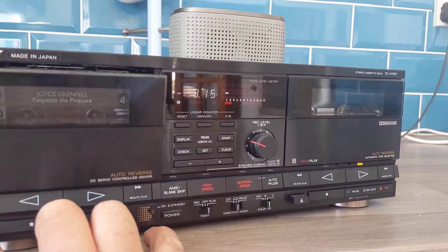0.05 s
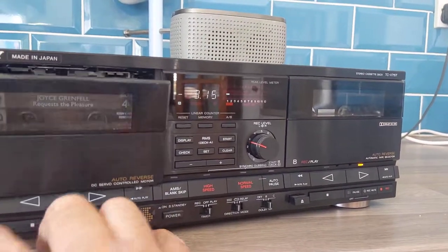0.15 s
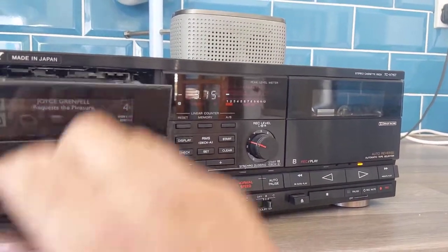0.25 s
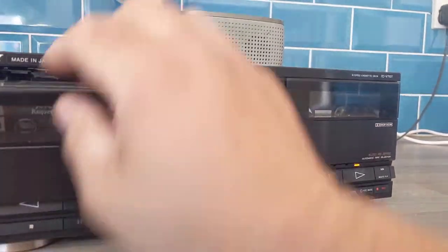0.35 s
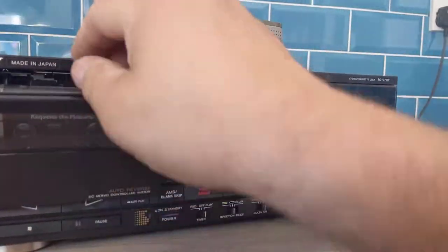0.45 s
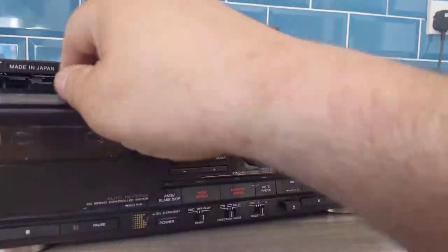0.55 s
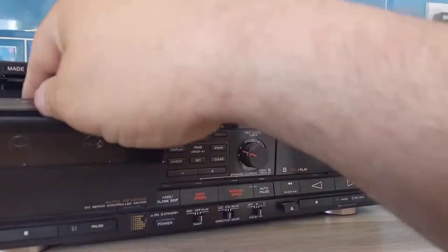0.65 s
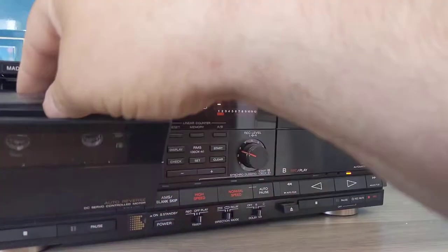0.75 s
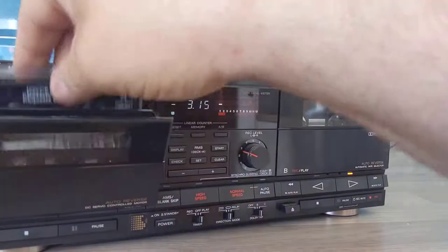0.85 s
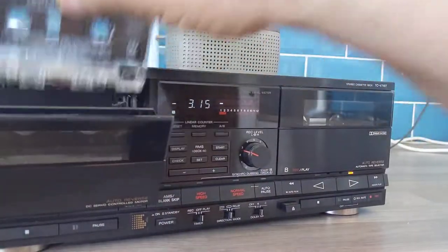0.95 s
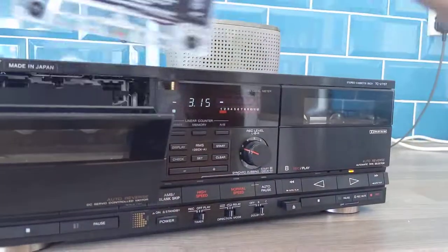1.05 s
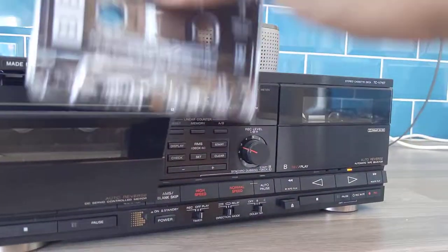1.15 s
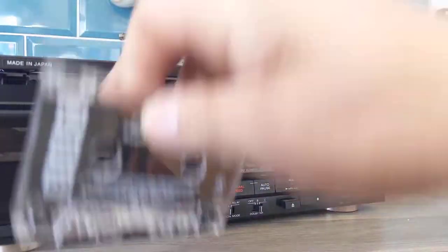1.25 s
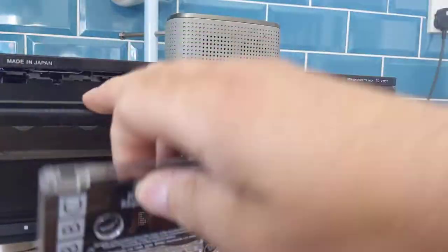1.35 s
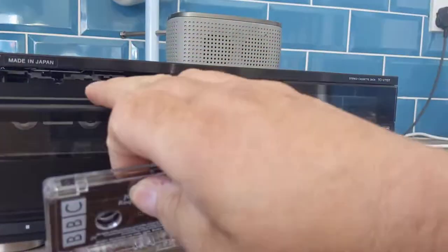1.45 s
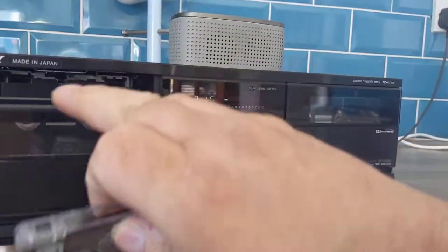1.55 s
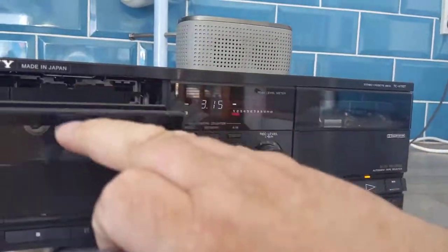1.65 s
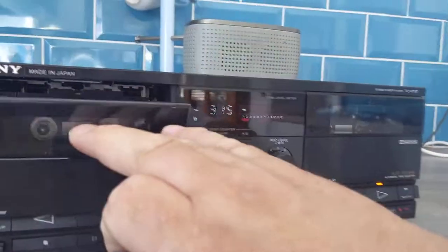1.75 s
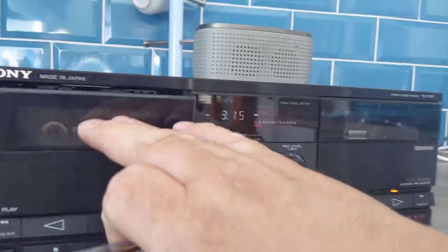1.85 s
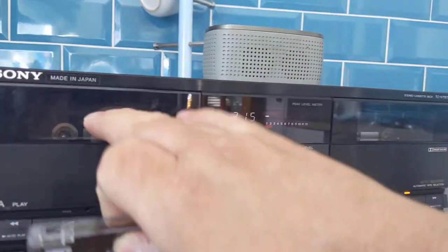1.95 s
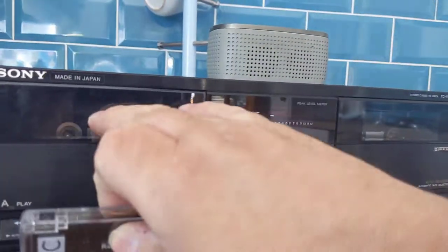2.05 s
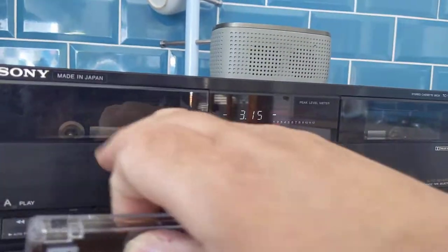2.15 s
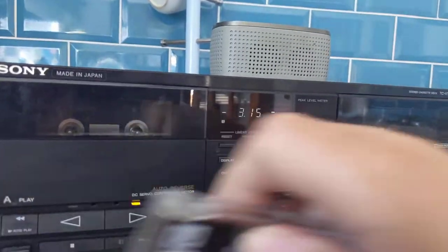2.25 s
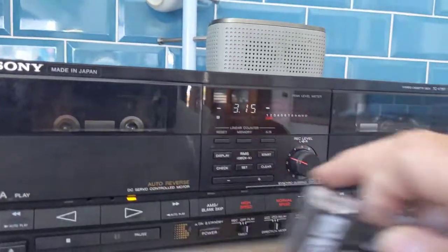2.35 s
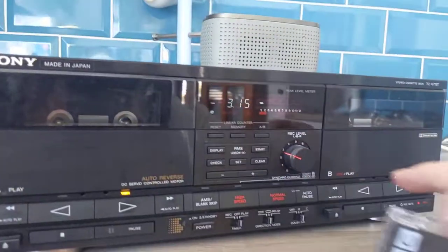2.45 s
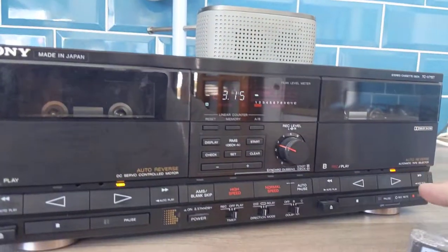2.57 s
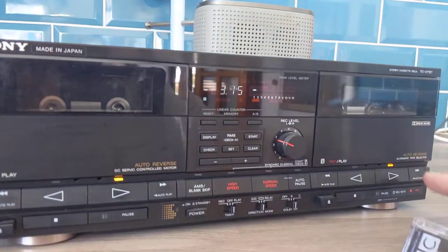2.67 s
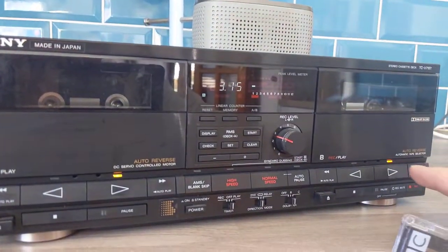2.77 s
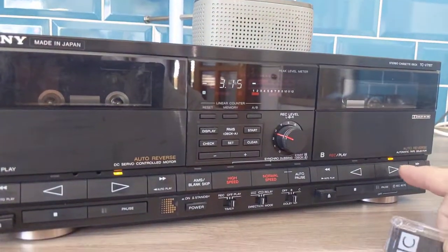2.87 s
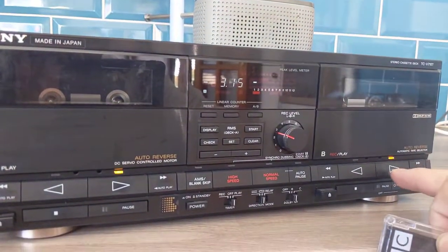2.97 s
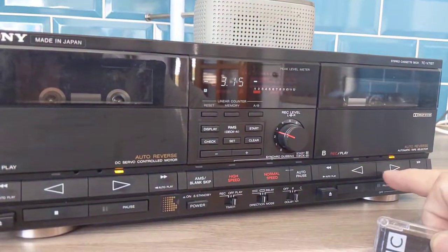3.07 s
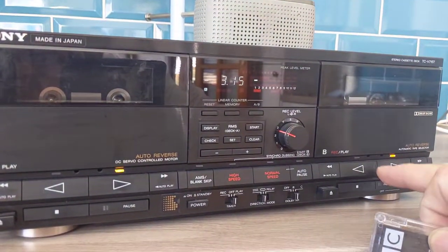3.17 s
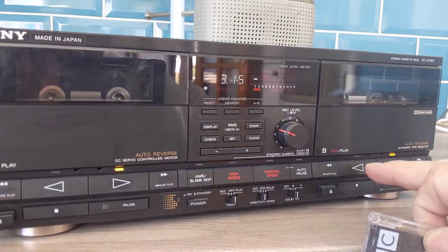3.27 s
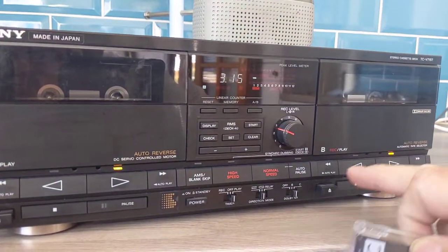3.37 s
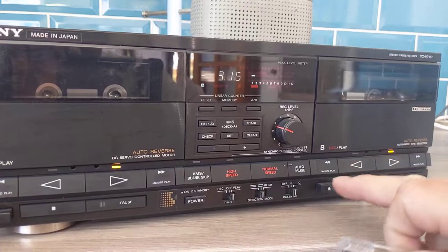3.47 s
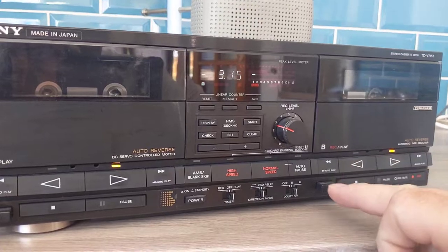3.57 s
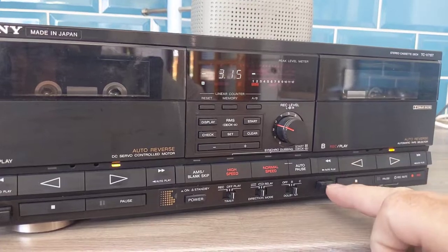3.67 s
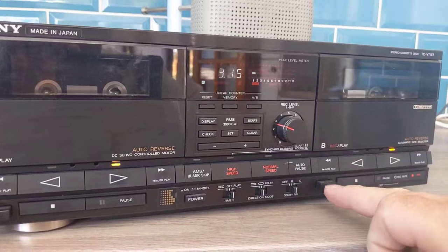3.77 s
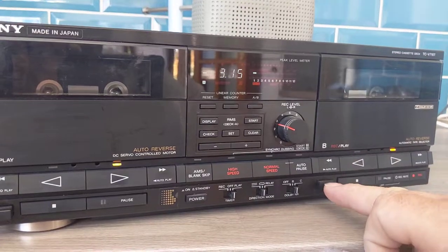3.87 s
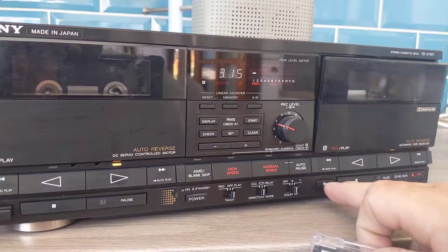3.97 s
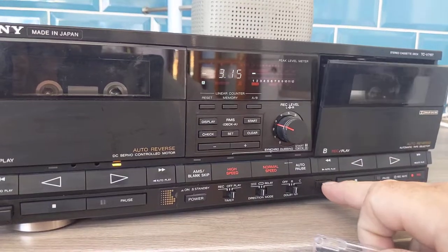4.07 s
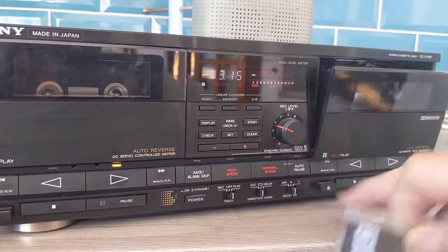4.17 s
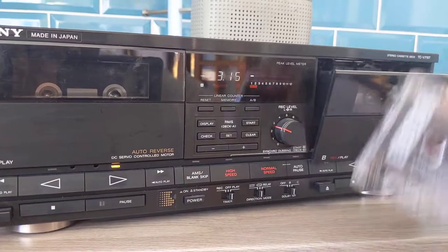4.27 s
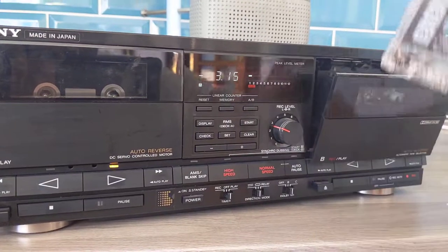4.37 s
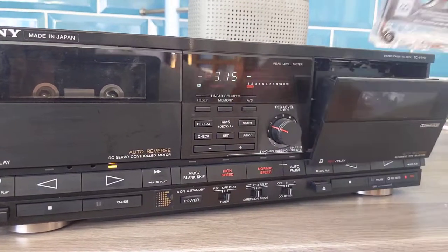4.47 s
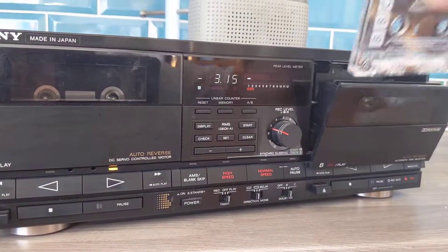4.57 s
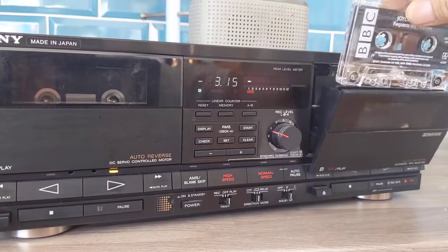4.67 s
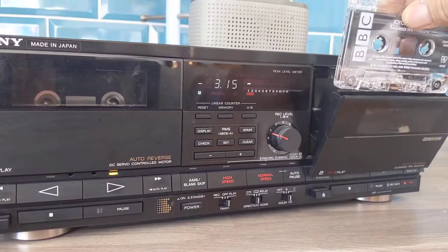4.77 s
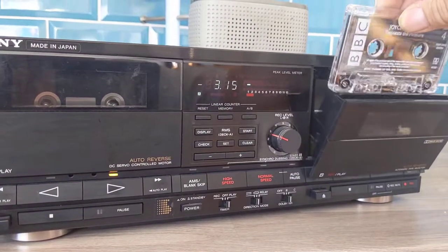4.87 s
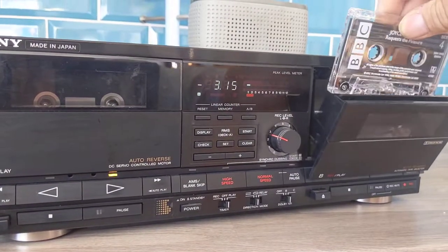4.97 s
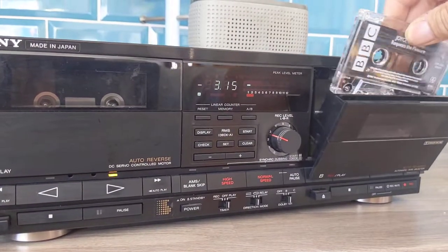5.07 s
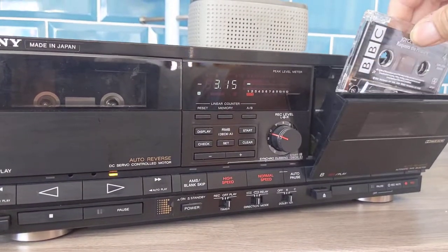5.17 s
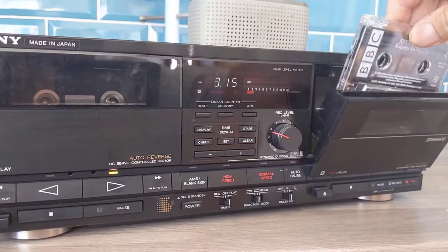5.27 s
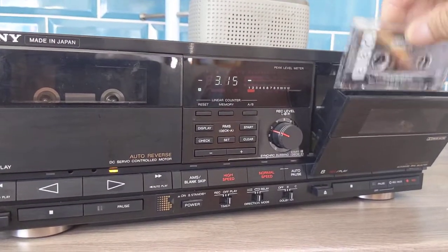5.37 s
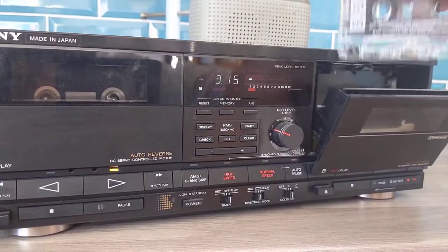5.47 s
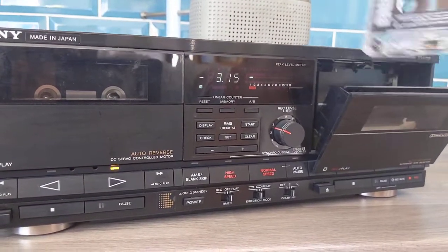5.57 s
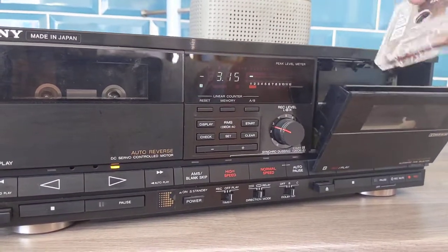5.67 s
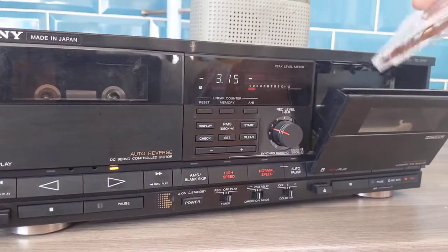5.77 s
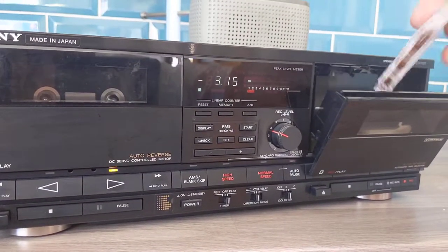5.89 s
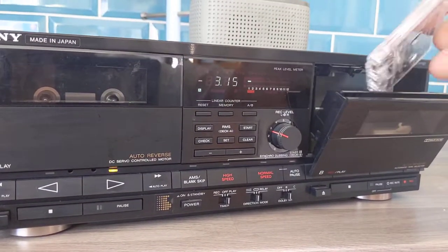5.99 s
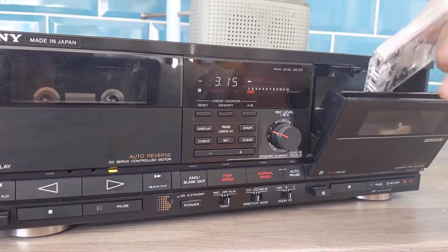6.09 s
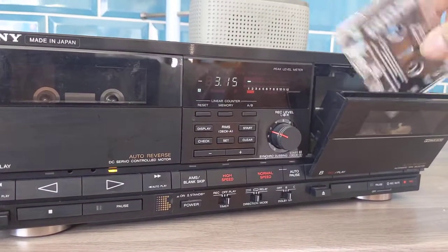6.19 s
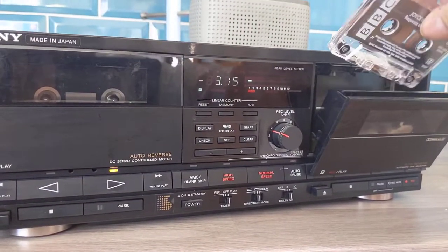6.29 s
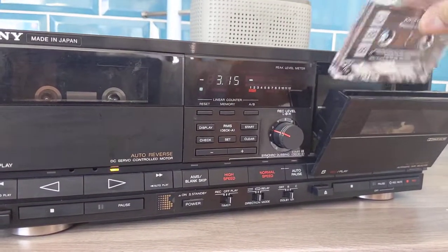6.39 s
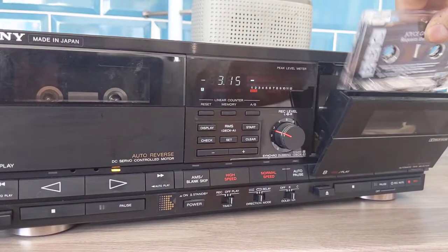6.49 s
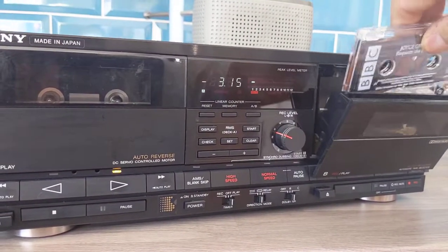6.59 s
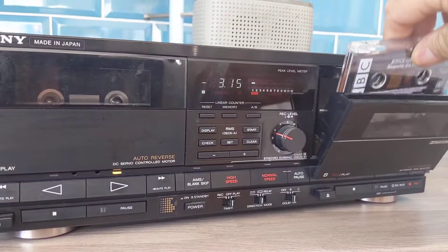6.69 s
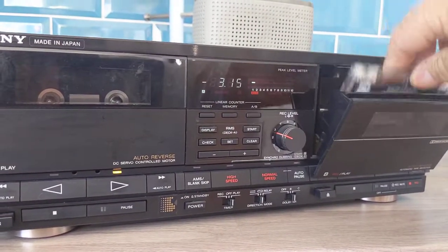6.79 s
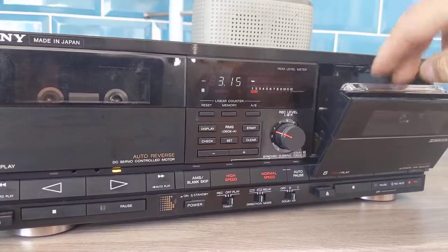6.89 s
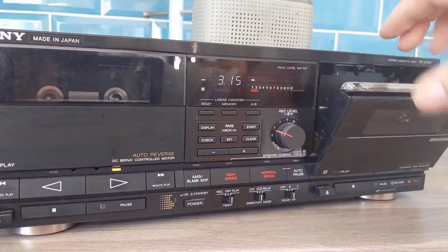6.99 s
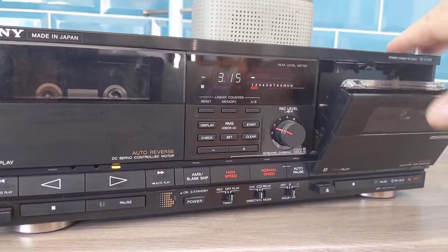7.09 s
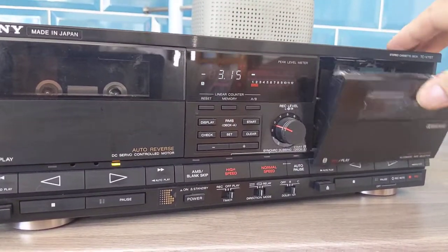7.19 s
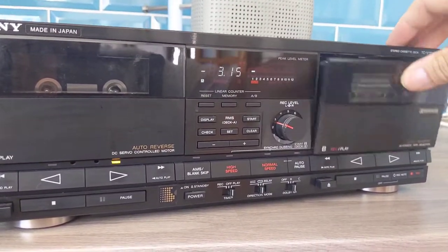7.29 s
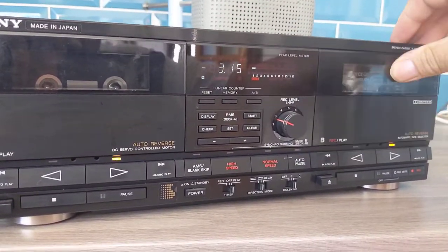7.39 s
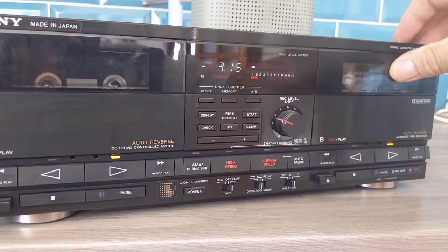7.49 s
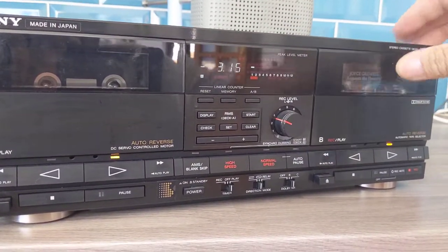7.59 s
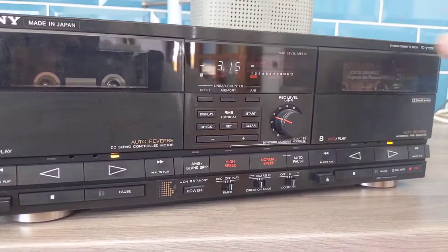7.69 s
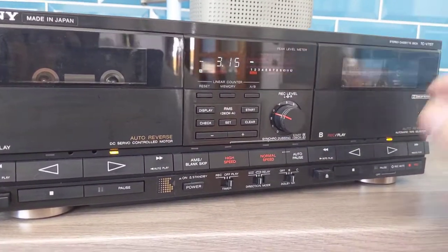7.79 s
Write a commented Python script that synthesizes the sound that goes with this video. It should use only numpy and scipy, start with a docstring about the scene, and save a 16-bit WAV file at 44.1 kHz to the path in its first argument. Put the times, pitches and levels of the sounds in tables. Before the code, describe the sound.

Close, dry clunks of cassette deck doors opening and snapping shut, a plastic tape rattling and tapping between, over a faint room hiss.

```python
"""Hand at a twin cassette deck

A deck on a counter in a small tiled room, heard close up by a two-port microphone. A door pops open, a plastic
cassette is pulled out, rattles, taps the other well, slides in and the doors click shut. Every contact is a short
scrape of hard plastic that rings the cabinet and is answered by the tiles. Shaped noise makes the sliding,
the gear whirr and the faint room floor; wavering sines make two thin squeaks."""
import sys
import numpy as np
from scipy import signal
from scipy.fft import rfft, irfft, next_fast_len
from scipy.io import wavfile
from scipy.ndimage import uniform_filter1d, map_coordinates

SR = 44100
rng = np.random.default_rng(int(sys.argv[2]) if len(sys.argv) > 2 else 0)


def int16_out(signal):
    """Quantize to a 16-bit WAV file."""
    q = np.round(np.clip(np.atleast_2d(signal).T, -1, 1) * 32767)
    wavfile.write(sys.argv[1], SR, q.astype(np.int16))


N = 345744
SPAN, LEAD = 16384, 256  # window of one contact and the silence at its start [samples]


def amp(db):
    """Decibels to linear gain."""
    return 10 ** (np.asarray(db) / 20)


def unit(x):
    """Scales a signal to rms 1."""
    return x / np.sqrt(np.mean(x ** 2) + 1e-20)


def along(points, hz):
    """Reads a curve of (frequency [Hz], value) on a log frequency axis."""
    f, v = np.transpose(points)
    return np.interp(np.log(hz + 1), np.log(f + 1), v)


def level(points):
    """Gain per sample from a curve of (time [s], level [dB]); -120 dB outside it."""
    when, db = np.transpose(points)
    return amp(np.interp(np.arange(N) / SR, when, db, left=-120, right=-120))


def wobble(rate):
    """A smooth random curve with `rate` knots a second."""
    knots = rng.standard_normal(int(N * rate / SR) + 4)
    return map_coordinates(knots, [np.arange(N) * rate / SR])


def filtered(x, response):
    """Multiplies the spectrum of x by a response of frequency."""
    m = next_fast_len(N + 8192)
    return irfft(rfft(x, m) * response(np.fft.rfftfreq(m, 1 / SR)), m)[..., :N]


# Likeness of diffuse sound at the two ports: (frequency [Hz], correlation [-1 to 1])
PORT_LIKENESS = [(30, 1), (70, 0.79), (110, 0.98), (180, 0.92), (550, 0.6), (900, 0.31), (1650, -0.027),
                 (4970, -0.12), (15000, -0.083)]


def diffuse(pair, f):
    """Mixes two unrelated spectra so that the ports agree closely in the bass only."""
    turn = np.arccos(np.clip(along(PORT_LIKENESS, f), -1, 1)) / 2
    mid = pair[..., 0, :] * np.cos(turn)
    side = pair[..., 1, :] * np.sin(turn)
    return np.stack([mid + side, mid - side], axis=-2)


def rush(spectrum):
    """Diffuse stereo noise of rms 1, coloured by (frequency [Hz], relative level [dB per Hz])."""
    m = next_fast_len(N)
    f = np.fft.rfftfreq(m, 1 / SR)
    noise = rfft(rng.standard_normal((2, m)))
    return unit(irfft(diffuse(noise, f) * amp(along(spectrum, f)), m)[:, :N])


# Colour of the room floor: (frequency [Hz], relative level [dB per Hz])
FLOOR_COLOUR = [(29, -58), (50, -10), (81, -15.5), (103, -23), (234, -26), (450, -25.5), (483, -27.5),
                (572, -31.5), (997, -28.5), (3030, -38), (4040, -38.5), (4900, -39.5), (7800, -48),
                (10300, -41), (16000, -51.5)]
# Course of the lowest rumble: (time [s], level [dB])
RUMBLE_LEVEL = [(0.0, -54), (0.57, -56.5), (1.03, -68), (1.77, -51.5), (2.12, -70), (2.51, -50.5),
                (4.37, -58), (4.39, -65.5), (7.84, -57.5)]


def room_floor():
    """Faint drifting hiss over a low rumble that comes and goes, its lumps a little different at each port."""
    hiss = amp(-60 + 1.2 * wobble(1.96)) * rush(FLOOR_COLOUR)
    rumble_colour = [(8, -24), (19, -4.5), (30, -13.5), (45, -52.0), (80, -56.0), (200, -120)]
    lumps = amp(0.65 * wobble(7.5) + 1.9 * np.array([wobble(9), wobble(7.2)]))
    rumble = level(RUMBLE_LEVEL) * unit(lumps * rush(rumble_colour))
    return hiss + rumble


# Brief turning of the mechanism: (time [s], level [dB])
WHIRR_LEVEL = [(2.613, -62), (2.824, -61), (2.954, -73), (3.0, -71)]
# Colour of the gears: (frequency [Hz], relative level [dB per Hz])
GEAR_COLOUR = [(410, -44), (700, -12), (1220, -27), (1490, 7), (2090, 8), (3810, -15), (5000, -12),
               (6500, -52), (11000, -120)]
# Faint thin squeaks: (start [s], end [s], mean pitch [Hz], mean peak level [dB])
SQUEAK_EVENTS = [(4.596, 4.633, 2280, -54), (4.605, 4.668, 4120, -61)]


def mechanism():
    """Small gears whirr as flickering coloured noise; squeaks are sines wavering in pitch and level."""
    t = np.arange(N) / SR
    out = level(WHIRR_LEVEL) * unit(amp(1.1 * wobble(110)) * rush(GEAR_COLOUR))
    for start, stop, hz, db in SQUEAK_EVENTS:
        swell = np.sin(np.pi * np.clip((t - start) / (stop - start), 0, 1))
        loudness = amp(db + 2.5 * wobble(120)) * swell
        phase = 2 * np.pi * np.cumsum(hz + 40 * wobble(300)) / SR
        out = out + loudness * np.sin(phase)
    return out


# Fingers and plastic sliding: (start of hold [s], held [s], body level [dB], hiss level [dB])
STROKE_EVENTS = [(0, 0.011, -38.5, -45.5), (0.219, 0.0027, -43.5, -50.5), (0.699, .25, -51.5, -59.5),
                 (1.38, 0.14, -59, -58.5), (1.49, 0.0073, -50.5, -62), (1.77, 0.071, -77, -81),
                 (1.89, .04, -52.5, -72), (2.023, 0.006, -33.5, -40), (2.2, 0.057, -56.5, -81),
                 (3.9, .2, -56.5, -88), (4.16, 0.21, -55.5, -67), (4.4, 0.24, -61.5, -66),
                 (4.712, 0.026, -46.5, -68), (4.83, 0.16, -51, -60), (5.399, .05, -56, -56),
                 (5.52, 0.03, -38.5, -45), (5.63, 0.011, -39, -50), (5.82, 0.18, -61.5, -71),
                 (6.15, 0.043, -56, -64.5), (6.32, 0.0049, -40.5, -52), (6.58, 0.013, -38.5, -50),
                 (6.68, 0.033, -48.5, -68), (6.822, 0.09, -42, -47), (7, 0.28, -61, -97),
                 (7.36, .05, -42.5, -53), (7.441, 0.02, -33, -42), (7.64, 0.051, -55.5, -75.5)]
# Body of the sliding: (frequency [Hz], relative level [dB per Hz])
SLIDE_COLOUR = [(120, -63), (200, -3.5), (281, -9), (466, -15.5), (1160, -7.5), (1410, -13.5), (1980, -8),
                (4500, -22), (5850, -89), (9900, -120)]
# Hiss of the sliding: (frequency [Hz], relative level [dB per Hz])
HISS_COLOUR = [(2350, -21), (4000, 1), (5310, 10), (6110, 2.5), (12400, 0.5), (16000, -1)]
STROKE_RISE_DB_PER_S, STROKE_FALL_DB_PER_S = 182, 141


def rubbing():
    """Skin and plastic slide over plastic: each stroke swells, holds and dies, a grainy rustle."""
    grain = amp(1.8 * wobble(40) + 2.5 * wobble(250))
    t = np.arange(N) / SR
    body, hiss = np.full(N, -120.0), np.full(N, -120.0)  # levels in dB
    for start, held, body_db, hiss_db in STROKE_EVENTS:
        before_db = STROKE_RISE_DB_PER_S * np.maximum(start - t, 0)
        after_db = STROKE_FALL_DB_PER_S * np.maximum(t - start - held, 0)
        away_db = before_db + after_db
        body = np.maximum(body, body_db - away_db)  # the louder stroke wins
        hiss = np.maximum(hiss, hiss_db - away_db)
    return amp(body) * unit(grain * rush(SLIDE_COLOUR)) + amp(hiss) * unit(grain * rush(HISS_COLOUR))


# Decay of the tiled room: (frequency [Hz], time to fall 60 dB [s])
TILE_DECAY = [(150, 0.94), (500, 0.37), (1500, 0.36), (4000, 0.38), (12000, 0.26)]


def tiles(count, f):
    """A new diffuse noise tail for each contact; every frequency dies at its own speed."""
    noise = rng.standard_normal((count, 2, SPAN * 3 // 4))
    hz, t, z = signal.stft(noise, SR, nperseg=256, noverlap=128)
    decay = amp(-60 * t / along(TILE_DECAY, hz)[:, None])
    tail = signal.istft(z * decay, SR, nperseg=256, noverlap=128)[1]
    tail = tail * np.clip((np.arange(tail.shape[-1]) - LEAD) / (0.0033 * SR), 0, 1)  # builds up over 3.3 ms
    return diffuse(rfft(tail / np.sqrt(np.mean(np.sum(tail ** 2, axis=-1))), SPAN), f)


def nearby(count, echo_db, within_s):
    """A few quick echoes off counter and cabinet, different at each port."""
    when, size = rng.random((count, 2, 6)), rng.standard_normal((count, 2, 6))
    delay = np.clip(when * within_s * SR, 8, 2000).astype(int)
    paths = np.zeros((count, 2, SPAN // 8))
    np.put_along_axis(paths, delay, amp(echo_db) * size, axis=2)
    return rfft(paths, SPAN)


def peak(f, hz, width_hz):
    """A causal resonance of gain 1 at its centre."""
    return 1j * f * width_hz / (hz * hz - f * f + 1j * f * width_hz)


def ringing(f, modes, scatter_db, near_hz, db_per_octave):
    """One response per blow: modes draw new strengths and signs, and change level by a set amount per octave
    away from the struck pitch."""
    hz, db, t60 = np.transpose(modes)
    draw = rng.standard_normal((len(near_hz), 2, len(hz)))
    shapes = peak(f, hz[:, None], np.log(1000) / np.pi / np.abs(t60[:, None]))
    db = db - db_per_octave * np.abs(np.log2(hz / near_hz))
    strength = amp(db + scatter_db * draw[:, 0]) * np.sign(draw[:, 1])
    return strength @ shapes


def scrape(rise_s, life_s, after_db, after_s, grit_db):
    """Rough pushes, one a row: a gritty blow that stops short, then the many small panel modes rustling out."""
    t = np.arange(SPAN // 3) / SR
    blow_and_rustle = np.exp(-(t / life_s) ** 2) + amp(after_db) * np.exp(-t / after_s)
    shape = (1 - np.exp(-t / rise_s)) * blow_and_rustle
    noise, grit = rng.standard_normal((2, *shape.shape))
    grit = amp(grit_db * unit(uniform_filter1d(grit, size=24)))  # the surfaces chatter as they meet
    push = rfft(np.pad(noise * grit * shape, ((0, 0), (LEAD, 0))), SPAN)
    return push / np.sqrt(uniform_filter1d(np.abs(push) ** 2, size=128))  # drives every band about equally


RISE_S = 0.00097  # build-up time constant of a blow
KNOCK_DB, KNOCK_DB_PER_DOUBLE_LENGTH = 0, -2.5  # clean knock over the scrape; a long contact is mostly scrape
USUAL_MS = 6.5  # contact length at which the knock and room trims are zero
THUD_LATE_S = 0.00392  # the heavy chassis answers a moment later


def push_spectra(f, ms):
    """The force of hand on plastic, per layer: rough blow, shorter rough snap twice, plain push, late push."""
    life, rise = np.clip(ms, .5, 60) / 1000, np.full_like(ms, RISE_S)
    blow = scrape(rise, life, -13.5, 0.044, 5.3)
    snap = scrape(0.46 * rise, 0.47 * life, -19.0, 0.031, 6.8)  # the treble of a blow is over sooner
    shove = np.exp(-2j * np.pi * f * (LEAD / SR + rise))  # one plain push
    knock_db = KNOCK_DB + KNOCK_DB_PER_DOUBLE_LENGTH * np.log2(ms / USUAL_MS)
    blow = blow / np.sqrt(np.mean(np.abs(blow) ** 2, axis=-1, keepdims=True)) + amp(knock_db) * shove
    late_shove = shove * np.exp(-2j * np.pi * f * THUD_LATE_S)
    return np.array([blow, snap, snap, shove, late_shove])


# Panels and doors of the cabinet: (frequency [Hz], relative level [dB], time to fall 60 dB [s])
CABINET_MODES = [(697, 2.5, 0.16), (726, -3, 0.028), (774, -1.5, 0.017), (869, -6.5, 0.031),
                 (898, -2.5, 0.022), (1180, -1.5, 0.067), (1249, -5.5, 0.027), (1400, -10, 0.017),
                 (1701, -3, 0.073), (1860, -8.5, 0.096), (2060, -4.5, 0.1), (2426, -7, 0.13),
                 (2630, -7, 0.095), (2890, -7.5, 0.2), (3900, -18, 0.1), (4830, -29, 0.029)]
# Hollow chassis on the counter: (frequency [Hz], relative level [dB], time to fall 60 dB [s])
CHASSIS_MODES = [(73.4, -17, 0.25), (113, -17.5, 0.32), (137, -10.5, 0.55), (165.1, -13, 0.33),
                 (210.9, -9.5, 0.16), (258.8, -5, 0.43), (269.6, -2.5, 0.51), (299.9, -3.5, 0.29),
                 (363.1, -2.5, 0.32), (390.4, -11.5, 0.21)]
RING_WIDTH_HZ, RING_SWELL_HZ = 55.6, 258  # the struck part's own note: how soon it dies, how fast it swells
NEIGHBOUR_DB, NEIGHBOUR_SPREAD = -10, 0.157  # joined parts ring along; typical distance [natural log of pitch]


def body_responses(f, hz):
    """What each push sets ringing: panel clack, hard edge, treble tick, the struck part's note, chassis thud."""
    def note(at):
        return peak(f, at, RING_WIDTH_HZ) * peak(f, at, RING_SWELL_HZ)

    struck = peak(f, hz, 0.35 * hz) ** 2
    panels = ringing(f, CABINET_MODES, 2.54, hz, db_per_octave=4)
    clack = struck + amp(-0.5) * peak(f, 1860, 1370) ** 2 + amp(10.5) * panels
    clack = clack * (f / (f - 600j)) ** 3 * 4000 / (4000 + 1j * f)  # small panels radiate no bass
    edge = peak(f, 3455, 3950) ** 2
    tick = peak(f, 9730, 4570) * peak(f, 10000, 6000) + amp(4.5) * peak(f, 6300, 6950) ** 2
    beside = hz * np.exp(NEIGHBOUR_SPREAD * np.array([-1, 1]) * (.5 + rng.random((len(hz), 2))))
    ring = note(hz) + amp(NEIGHBOUR_DB) * (note(beside[:, 1:]) - note(beside[:, :1]))
    # chassis modes gain a little with distance from the struck pitch
    thud = ringing(f, CHASSIS_MODES, 3.9, hz, db_per_octave=-1) * 400 / (400 + 1j * f)
    return np.array(np.broadcast_arrays(clack, edge, tick, ring, thud))


# Every contact: (time [s], clack peak before placing [dB], thud [dB], edge [dB], treble [dB],
# struck pitch [Hz], contact length [ms], ring [dB]); the ring is its peak over the clack's peak,
# thud, edge and treble are short-burst rms over the clack's peak
CONTACT_EVENTS = [(0.003, -27.5, -16, -17, -11, 1210, 3.6, -9), (0.038, -16, -29, -6.5, -5, 772, 7.3, -12),
                  (0.043, -20, -38, -9, -11, 1690, 5.5, -3.5),
                  (0.186, -17.5, -20.5, -6, -9.5, 1164, 5.6, -5.5),
                  (0.191, -25, -32, -8, -15, 2476, 5.1, -5), (0.526, -41, -23, -20, -18, 1010, 9.1, -7),
                  (0.537, -30.5, -19.5, -35, -11.5, 776, 11, 2),
                  (0.552, -34, -16.5, -30, -25, 890, 5.7, -3), (0.671, -38.5, -33, -28, -4, 1650, 4.2, -14),
                  (0.68, -34, -12, -27, -10, 1920, 12, -9), (0.71, -51, 1.5, -25, -20, 890, 5.5, -3),
                  (0.731, -53, -14, -23, 5, 1160, 6.4, -9), (0.779, -43.5, -23, -20, -10, 1680, 18, -3),
                  (0.793, -26, -16, -4.5, -2, 1680, 5.4, -11), (0.805, -32, -27, -15, -14, 1990, 11, -15),
                  (0.812, -30, -18.5, -1.5, -0.5, 1130, 11, -8), (0.823, -36, -25, -16, -6, 1670, 5.9, -3),
                  (0.831, -37, -15, -20, -20, 890, 7.4, -9), (0.865, -50, 0, -20, -20, 900, 8, -5),
                  (0.894, -36, -20, -31, -12, 1130, 13, -11), (0.923, -33.5, -29, -20, -21, 1550, 12, -16),
                  (0.933, -29.5, -35, -9, -13, 1145, 3.6, -12), (0.955, -24, -35, -26, -3, 2270, 7.2, -8),
                  (0.966, -30, -22, -0.5, -8, 964, 6.6, -4), (1.076, -44.5, -33, -29, 0, 990, 11, -14),
                  (1.096, -31.5, -54, -39, -11, 1480, 1.7, -5.5), (1.105, -29, -50, -25, -18, 1500, 4, -10),
                  (1.117, -43.5, -43, -36, -1, 1375, 3.4, -7),
                  (1.211, -47.5, -15, -11, 6.5, 2020, 4.6, -14), (1.215, -54, -34, -10, -1, 2020, 4.3, -18),
                  (1.242, -44, -28, -1, -8, 2020, 4, -10), (1.249, -45, -39, -7, 10.5, 1950, 7.1, -12),
                  (1.264, -40.5, -25, -20, 1, 1350, 4, -7), (1.299, -45, -25, -15, 9.5, 3570, 4.9, -5),
                  (1.307, -65, -30, -12, 3, 3700, 6.7, -12), (1.453, -46, -33, -0.5, -26, 1160, 3.7, -18),
                  (1.48, -37.5, -7.5, -35, -16, 710, 6.8, -24), (1.755, -22, -30, -20, -12.5, 940, 10, -15),
                  (1.768, -27.5, -43, -25, -23, 797, 40, -11), (1.875, -35, -6.5, -5, -37, 644, 4.4, -8),
                  (1.892, -44, -26, -2, 3, 1110, 5.2, 5), (1.969, -30.5, -13.5, -7, -31, 736, 9.7, 1),
                  (1.994, -21, -27, -13, -22, 1870, 7.5, -20), (2.001, -17, -23, -6, -13, 737, 10, -5.5),
                  (2.011, -18.5, -16.5, -7.5, -12, 688, 4.1, -2.5),
                  (2.028, -28, -30, -14, -19, 1980, 7.2, -11), (2.042, -34.5, -3.5, -16, 2, 710, 3.9, -3),
                  (2.071, -34.5, -23, -12, -16, 1920, 5, -7), (2.137, -33, -8.5, -24, -26, 764, 9.6, 0.5),
                  (2.147, -32, -11.5, -1, -10, 3860, 6.1, -3), (2.342, -39.5, -17, 1, 11, 4320, 6.4, -9),
                  (2.37, -46.5, -30, 1, -21, 2100, 8.1, -2), (2.474, -54, -28, 1, -2, 3690, 1.8, -9),
                  (2.567, -55, -30, -10, -20, 3200, 3, -14), (2.613, -38.5, -25, -20, -20, 1880, 2.4, -13),
                  (2.655, -49, -28, -26, -26, 1830, 3.5, -9), (2.673, -55, -21, -24, -26, 2210, 2.7, -1),
                  (2.716, -55, -35, -26, -26, 1800, 4, -6), (2.756, -58, -5, -21, 8, 2000, 10, -11),
                  (2.911, -35.5, -43, -17.5, -27, 1400, 8, -34), (3.76, -33, -28, -2.5, -13, 726, 9.8, -25),
                  (3.911, -43.5, -6, -35, -7.5, 820, 41, -15), (3.927, -38, -11, -6, -28, 1280, 5.1, -9),
                  (3.975, -30, -42, -37, -20, 762, 23, -18), (3.992, -27.5, -14, -44, -7, 1910, 23, -10),
                  (4.078, -43, -14, -8, -24, 800, 14, -7), (4.133, -40.5, -11, -5.5, -24, 766, 10, -6),
                  (4.165, -38, -28, -20, -25, 990, 8, -9), (4.172, -21, -18, -0.5, -10, 780, 6.9, -12),
                  (4.187, -19, -33, -13, -12, 1320, 3.5, -5), (4.194, -27.5, -17, -15, -22, 790, 8.8, -6),
                  (4.354, -51, -10, 1, -2, 1170, 2.2, -7), (4.673, -18, -22, -2, -18, 1310, 5.2, -18),
                  (4.695, -23.5, -18, 5.5, -5, 1164, 14, 0.5), (4.721, -32, -11, -18, -25, 2760, 8, -9),
                  (4.855, -37.5, -16, -10, -26, 884, 10, -9), (4.929, -61, 7, 13, 13, 1090, 10, -9),
                  (4.96, -31.5, -11, -1.5, -10, 1380, 9.1, -9), (4.985, -52, -31, -15, -20, 790, 6, -7),
                  (5.031, -40, -14, -6, -14, 1210, 7, -9), (5.126, -53, -18, -2, -11, 890, 5.4, -11),
                  (5.154, -29, -18.5, -8, -23, 910, 3.5, -5.5),
                  (5.205, -30.5, -22, -10.5, -14, 1193, 2.4, -10),
                  (5.299, -31, -21.5, -12, -19, 756, 1, -20), (5.346, -40.5, -40, -3, -24, 1260, 3.5, -4),
                  (5.403, -31.5, -46.5, -9, -5, 1110, 5.3, -18),
                  (5.444, -21, -25.5, -0.5, -8, 797, 5.8, -10),
                  (5.468, -22.5, -25, 0.5, 1.5, 1290, 7.8, -15),
                  (5.504, -10.5, -24.5, -2, 0, 670, 4.7, -10.5),
                  (5.520, -19.5, -40, -8, -6, 1090, 9.1, -11),
                  (5.622, -16, -26.5, -13, -14.5, 1140, 5.6, -14),
                  (5.811, -45, -13, -20, -11, 720, 3.4, -9), (5.941, -64, -28, 18, -22, 3590, 7, -11),
                  (5.963, -30.5, -17, 1.5, 1, 1300, 4.6, -12), (5.991, -26, -17, -1, 0.5, 780, 26.7, -11.5),
                  (6.132, -43.5, -14, -18, -27, 705, 6.6, -7), (6.165, -39, -36, -22, -22, 750, 6.1, -18),
                  (6.252, -24, -21, 1, -16, 1264, 4.8, -2), (6.286, -21.5, -18, -2, 0, 737, 5, -2.5),
                  (6.311, -37, -16, -19, -20, 2010, 6.3, -6), (6.363, -42, -30, -6, 6, 3500, 5, -12),
                  (6.446, -47, -37, 2, 8, 2460, 9, -16), (6.455, -37.5, -23, -6, 0, 1580, 3.8, -16),
                  (6.492, -21.5, -24, -4.5, -17, 920, 6.1, -5.5),
                  (6.543, -23, -13, -0.5, -11, 1180, 5.3, -9), (6.55, -30, -45, 3, -12, 1530, 5.7, -18),
                  (6.563, -20.5, -37, -3.5, -5.5, 882, 4, -10), (6.578, -32.5, -36, -13, -7, 1270, 7.7, -5),
                  (6.626, -25.5, -18.5, -3, -11, 935, 4.2, -7),
                  (6.687, -23, -29, -2, -0.5, 893, 10.7, -8.5), (6.777, -52, -27, 10, 0, 1258, 8, -11),
                  (6.812, -32, -22, 4.5, 10.5, 1150, 28, -9), (6.862, -26, -34, -12, -12, 1530, 7.6, -19),
                  (6.870, -22, -18.5, 0, -11, 1683, 23, -8), (6.885, -47.5, -36, 23.5, 23.5, 1750, 37, 13),
                  (6.901, -16.5, -17, -17, -28.5, 1190, 4.3, -23), (7.159, -50.5, -2, 4, -24, 1470, 43, -7),
                  (7.171, -23, -20.5, -4, -12, 1760, 7.2, -7.5), (7.185, -36, -50, -20, 3.5, 1710, 26, -16),
                  (7.212, -29.5, -22.5, -3, -13, 1200, 5.6, -7.5),
                  (7.301, -34.5, -9, -10, -30, 1680, 16, -15), (7.319, -30.5, -8, -4.5, -11, 1110, 15, -8),
                  (7.338, -34, -35, -26, -7, 1240, 6.5, 0), (7.393, -32.5, -39, -9, 4.5, 1230, 12, -3),
                  (7.411, -14.5, -28, -8, -27, 1236, 7, -5.5), (7.421, -29, -27, -15, -25, 1480, 4.5, -18),
                  (7.438, -15.5, -28, -25, -14, 1180, 9.5, -9), (7.447, -16, -17, -6.5, -4.5, 743, 3.1, -4),
                  (7.473, -29.5, -4, -8, -31, 1910, 8, 2), (7.566, -27.5, -14, -3, 0, 4450, 5.1, -7)]
# Where the hand works as the ports hear it: (time [s], left port late [ms], left over right [dB]), bass excepted
HAND_PLACE = [(0, -0.41, 12.5), (1, -0.22, 12.5), (2.2, -0.1, 12.5), (2.8, 0.053, 8), (3.8, 0.19, 11.5),
              (4.8, 0.21, 8.5), (5.5, 0.091, 7), (6.8, .12, 6.5), (7.8, -0.12, 9.5)]
# Colour difference of the two ports: (frequency [Hz], left over right [dB]), bass excepted
PORT_COLOUR = [(60, 1), (290, 10.5), (640, -10.5), (1400, 5), (3100, -6), (4500, -5.5), (6800, -3),
               (9000, -8.5), (15000, -15.5)]
CREST_DB = 5  # a short burst peaks this far above its rms
BURST_S = .003  # the loudest moment of a contact is judged over this long
ONE_SIDED_HZ = 770  # well below this both ports hear a contact alike
ROOM_DB, ROOM_DB_PER_OCTAVE = -5, -2  # tiles' answer at 1 kHz; duller contacts fill the room more
ROOM_DB_PER_DOUBLE_LENGTH = 2  # a longer contact shakes more of the cabinet and so feeds the room more


def contacts():
    """Each contact is a short rough push: it clacks, ticks, rings the panels and thuds in the chassis."""
    s, db, thud_db, edge_db, treble_db, hz, ms, ring_db = np.transpose(CONTACT_EVENTS)[:, :, None]
    n, f = len(s), np.fft.rfftfreq(SPAN, 1 / SR)
    pushes, bodies = push_spectra(f, ms), body_responses(f, hz)

    # set every layer by its loudest burst
    early = irfft((pushes * bodies)[..., ::2], SPAN // 2)[..., :SPAN // 4]
    power = uniform_filter1d(early ** 2, size=round(BURST_S * SR))
    peak_over_rms = amp([9.3, 11.53, 13.37, 4.9, 2.85])[:, None, None]
    tops = peak_over_rms * np.sqrt(power.max(axis=-1, keepdims=True))
    layer_db = np.array([0 * db, edge_db + CREST_DB, treble_db + CREST_DB, ring_db, thud_db + CREST_DB])
    bodies = bodies * amp(db + layer_db) / tops
    direct = pushes * bodies

    # the walls hear the object from all sides, so only its mean colour reaches the room
    push_rms = np.sqrt(np.mean(np.abs(pushes[:4]) ** 2, axis=-1, keepdims=True))
    radiated = np.sum(bodies[:4] * push_rms, axis=0)
    room_db = ROOM_DB + ROOM_DB_PER_OCTAVE * np.log2(hz / 1000)
    room_db = room_db + ROOM_DB_PER_DOUBLE_LENGTH * np.log2(ms / USUAL_MS)

    # place the hand between the ports
    side = np.array([[.5], [-.5]])
    when, late_ms, left_db = np.transpose(HAND_PLACE)
    lag = np.interp(s, when, late_ms)[:, None] / 1000
    pan_db = np.interp(s, when, left_db)[:, None]
    sided = f ** 2 / (f ** 2 + ONE_SIDED_HZ ** 2)
    shadow = amp(side * (along(PORT_COLOUR, f) + pan_db) * sided)
    delay = np.exp(-2j * np.pi * f * side * lag * sided)
    near = direct[:4].sum(axis=0)[:, None] * delay * shadow * (1 + sided * nearby(n, -5.5, .005))
    far = radiated[:, None] * amp(room_db[:, None]) * tiles(n, f) * shadow ** 0.21
    thud = direct[4][:, None]  # alike at both ports

    heard = irfft(near + far + thud, SPAN)
    out = np.zeros((2, N + SPAN + LEAD))
    for start, sound in zip(np.round(s[:, 0] * SR).astype(int), heard):
        out[:, start:start + SPAN] += sound
    return out[:, LEAD:N + LEAD]


def scene():
    """Room floor, mechanism, sliding and contacts together."""
    return room_floor() + mechanism() + rubbing() + contacts()


TOP_HZ = 15900  # upper band limit


def record(dry):
    """The input stage rounds off the tallest spikes; above the band limit the level falls to -120 dB in 600 Hz."""
    soft = dry / (1 + np.abs(dry / .75) ** 4) ** (1 / 4)
    return filtered(soft, lambda hz: amp(-60 * np.clip((hz - TOP_HZ) / 300, 0, 2)))


dry = scene()
out = record(dry)
int16_out(out)
```